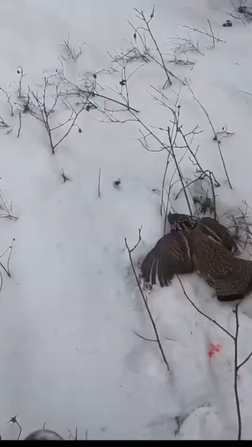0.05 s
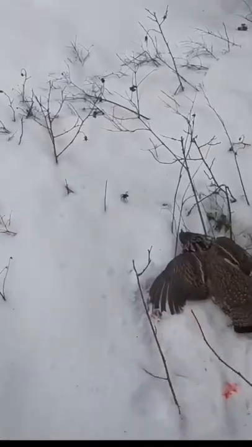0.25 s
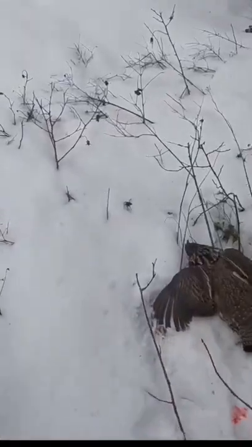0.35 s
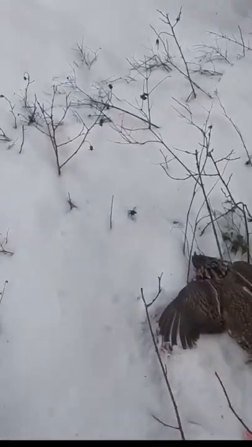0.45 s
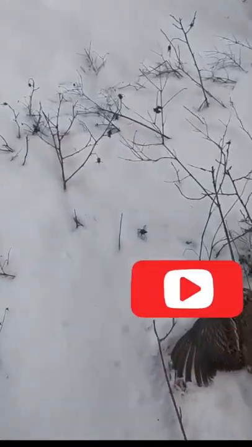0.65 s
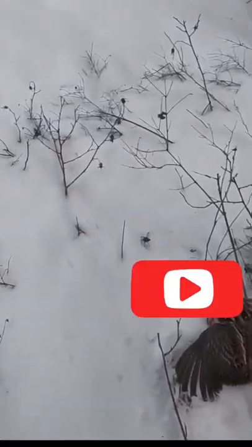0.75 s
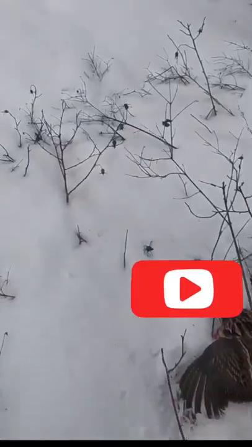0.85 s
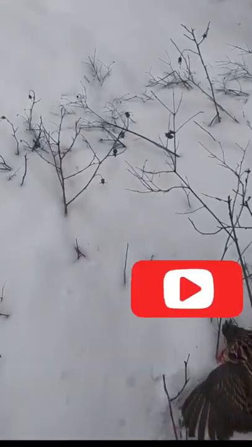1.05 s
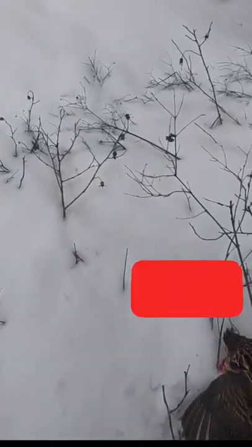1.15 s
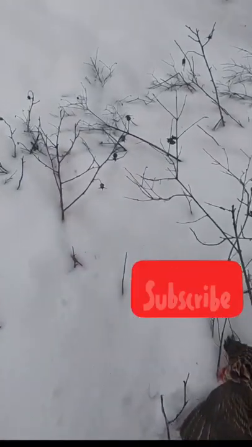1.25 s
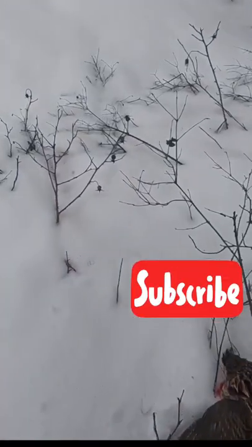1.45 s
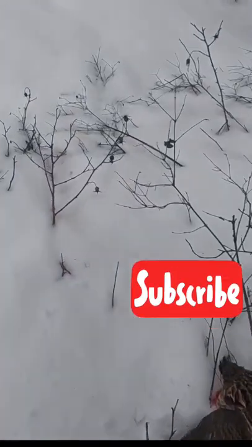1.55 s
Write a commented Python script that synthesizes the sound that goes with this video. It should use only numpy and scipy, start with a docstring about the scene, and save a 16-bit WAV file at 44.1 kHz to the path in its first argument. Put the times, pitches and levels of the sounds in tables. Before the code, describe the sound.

A bird scuffs through soft snow close to the microphone, making a short crunchy swish with dull thumps. It fades to a faint rustle and a few twig ticks, then a soft hollow knock, in quiet outdoor air.

```python
"""A grouse scuffs through soft snow, close by, over a very quiet noise floor.
A faint rustle and a few soft bumps lead in. From 0.2 s its body and feathers push through the snow:
a crunchy swish of tiny fractures and rubbing, with dull thumps and a low rumble underneath.
By 0.8 s the swish has died back to a faint rustle with a few twig ticks.
At 1.4 s comes a hollow knock, and right behind it a weaker rebound."""
import sys
import numpy as np
from scipy import signal
from scipy.fft import rfft, irfft, next_fast_len
from scipy.io import wavfile

SR = 44100
rng = np.random.default_rng(int(sys.argv[2]) if len(sys.argv) > 2 else 0)


def transcribe(signal):
    """Save signal, clipped to [-1, 1], as a 16-bit WAV file at the path in sys.argv[1]."""
    frames = np.atleast_2d(signal).T
    limited = np.clip(frames, -1, 1)
    pcm = np.round(limited * 32767).astype(np.int16)
    wavfile.write(sys.argv[1], SR, pcm)


N = 70560
TIME = np.arange(N) / SR

# Fader rides for the noise layers. Each row: time in seconds, level in dB.
RUMBLE_FADER = [(0, -62), (0.13, -75.5), (0.2, -67), (0.26, -46), (0.35, -54), (0.44, -44.5), (0.52, -52.5),
                (0.56, -52), (0.62, -52), (0.69, -67), (0.92, -67.5), (1.05, -78), (1.36, -88.5),
                (1.42, -86), (1.47, -71.5), (1.59, -67.5)]
HISS_FADER = [(0.03, -103), (0.17, -85), (0.33, -80), (0.375, -63), (0.42, -77), (0.55, -85.5), (0.6, -80),
              (0.71, -83), (0.745, -75.5), (0.79, -89), (0.83, -80.5), (0.88, -92.5), (0.945, -79.5),
              (1.12, -91), (1.25, -85.5), (1.32, -103.5), (1.5, -103), (1.59, -84)]
RUSTLE_FADER = [(0.024, -97), (0.038, -66.5), (0.08, -72), (0.158, -62.5), (0.19, -70), (0.5, -64.5),
                (0.68, -67), (0.745, -68), (0.79, -80), (0.865, -77.5), (0.93, -70), (1.0, -70),
                (1.17, -75.5), (1.24, -74.5), (1.325, -85), (1.395, -70.5), (1.48, -77), (1.55, -72)]
CRUNCH_FADER = [(0.03, -91), (0.2, -65), (0.216, -59), (0.242, -48.5), (0.276, -57), (0.306, -44.5),
                (0.34, -49.5), (0.372, -42.5), (0.394, -50), (0.43, -61), (0.444, -56), (0.465, -75.5),
                (0.49, -58.5), (0.558, -65), (0.578, -50), (0.605, -67.5), (0.74, -86.5), (0.8, -107)]
# EQ curves for the noise layers. Each row: frequency in Hz, relative gain in dB.
FLOOR_EQ = [(30, -3), (90, 9), (300, -8.5), (1200, -7), (1500, -8.5), (2700, -14), (3500, -25.5),
            (5600, -27), (6300, -15), (8500, -38.5)]
RUMBLE_EQ = [(10, -18.5), (30, 9.5), (55, -22.5), (85, 0.5), (150, -19), (300, -19), (600, -58),
             (2000, -100)]
HISS_EQ = [(1500, -28), (3000, -5.5), (4800, -2), (5750, -3), (6200, 11.5), (6800, -2.5), (7600, -4.5),
           (8500, -27)]
RUSTLE_EQ = [(40, -18), (90, 3.5), (200, 0.5), (380, -5), (680, -1), (1220, -1.5), (1360, -16),
             (1700, -12.5), (2700, -17), (3200, -33), (5000, -31.5), (8500, -48.5)]
CRUNCH_EQ = [(50, -21.5), (150, 2.5), (380, 6.5), (560, -2.5), (1220, -2), (1360, -20.5), (1600, -12.5),
             (2700, -17), (3200, -20.5), (4600, -29), (5600, -33.5), (6300, -23), (7400, -37.5),
             (8500, -65.5)]
# Stereo width. Each row: frequency in Hz, side over mid in dB.
WIDTH = [(60, -65), (500, -44.5), (1300, -43), (2800, -25), (4000, -17), (5200, -10), (6200, -5),
         (8000, -0.5)]
# Twig ticks and short scuffs of crust.
# Each row: start in seconds, peak in dB, centre in Hz, half-width in octaves, t60 in seconds.
TICKS = [(0.035, -49, 407, 1.1, 0.087), (0.2245, -38, 330, 1.02, 0.046), (0.4404, -49, 2600, 0.58, 0.0034),
         (0.441, -47, 800, 0.58, 0.021), (0.486, -46.5, 450, 0.74, .035), (0.572, -50, 2015, 0.27, 0.028),
         (0.591, -56, 6100, 1.1, .015), (0.678, -48.5, 840, 1.08, 0.011), (0.886, -54.5, 515, 1.25, 0.016),
         (1.049, -53, 2240, 1.64, 0.032), (1.218, -65, 1180, 1.1, 0.02), (1.374, -59.5, 400, 1.75, 0.012),
         (1.406, -53.5, 1150, 0.44, 0.053), (1.511, -62, 228, 0.46, 0.34)]
# The knock and its rebound. Each row: start in seconds, level in dB.
KNOCKS = [(1.4108, -38), (1.4297, -47)]
# The knock's resonances. Each row: pitch in Hz, gain in dB, t60 in seconds, attack in seconds.
KNOCK_MODES = [(252.3, 4.5, 0.054, 0.0043), (545, 3.5, 0.017, 0.0027), (651, 7.5, 0.014, 0.0013),
               (817, -3, 0.016, 0.00067), (1146, -17, 0.019, 0.00098), (1630, -8.5, 0.0093, 0.00044),
               (1900, -15, 0.016, 0.0013)]
# Dull body thumps. Each row: start in seconds, level in dB, starting pitch in Hz.
THUMPS = [(0.042, -50, 84), (0.071, -50.5, 95), (0.121, -52, 113.5), (0.2252, -28, 106.6),
          (0.306, -27.5, 91.4), (0.323, -30.5, 42.7), (0.369, -27.5, 111.2), (0.3808, -33, 99.4),
          (0.399, -34, 83.2), (0.4477, -34, 124.7), (0.491, -34.5, 88), (0.5055, -42.5, 48.5),
          (0.5702, -36, 102), (0.577, -39, 36.4), (0.726, -59.5, 113), (0.8204, -53, 89),
          (0.8875, -54.5, 140), (0.924, -58.5, 92), (1.2229, -60, 109), (1.427, -45.5, 130.6),
          (1.454, -53, 44.6)]


def amp(db):
    """Decibels to gain."""
    return 10 ** (np.asarray(db) / 20)


def unit(x):
    """Scale to rms 1."""
    return x / np.sqrt(np.mean(x ** 2) + 1e-20)


def curve_gain(points, hz):
    """Gain from (Hz, dB) points on a log frequency axis."""
    freqs, db = np.transpose(points)
    return amp(np.interp(np.log(hz + 1), np.log(freqs + 1), db))


def fader(points):
    """Gain per sample from (s, dB) points."""
    return amp(np.interp(TIME, *np.transpose(points)))


def since(start):
    """Seconds since an event, zero before it."""
    return np.maximum(TIME - start, 0)


def filtered(x, response):
    """Filter x by a gain given as a function of Hz."""
    size = next_fast_len(N + 8192)
    return irfft(rfft(x, size) * response(np.fft.rfftfreq(size, 1 / SR)), size)[..., :N]


def noise():
    """Two unrelated white noises."""
    return rng.standard_normal((2, N))


def stereo(pair, eq, widen_db=0):
    """EQ a pair of noises and scale to rms 1: mono in the bass, wide in the treble."""
    mid = filtered(pair[0], lambda hz: curve_gain(eq, hz))
    side = amp(widen_db) * filtered(pair[1], lambda hz: curve_gain(eq, hz) * curve_gain(WIDTH, hz))
    return unit(np.array([mid + side, mid - side]))


def grains(per_second, spread_db, rubbing):
    """Tiny fractures of uneven size over smooth rubbing noise."""
    sizes = amp(spread_db * np.minimum(rng.exponential(size=(2, N)), 4))
    breaks = rng.random((2, N)) < per_second / SR
    return unit(breaks * sizes * np.sign(noise())) + rubbing * noise()


def ring(t, hz, t60, attack):
    """One damped resonance; t60 and attack are in seconds."""
    return amp(-60 * t / t60) * (1 - np.exp(-t / attack)) * np.sin(2 * np.pi * hz * t)


def noise_floor():
    """A very quiet, steady background noise with a thin high hiss."""
    return amp(-79) * stereo(noise(), FLOOR_EQ)


def rumble():
    """Moving air swells in the low end, under the thumps."""
    return fader(RUMBLE_FADER) * stereo(noise(), RUMBLE_EQ)


def snow_rustle():
    """Lightly brushed snow, more rubbing than fracture: a faint rustle with a hiss on top."""
    texture = dict(per_second=1400, spread_db=6, rubbing=2)
    rustle = fader(RUSTLE_FADER) * stereo(grains(**texture), RUSTLE_EQ)
    hiss = fader(HISS_FADER) * stereo(grains(**texture), HISS_EQ, widen_db=1)
    return rustle + hiss


def twig_ticks():
    """Twigs and crust give way: one snap and a crumbling tail, each round its own pitch."""
    out = np.zeros(N)
    for start, db, centre, octaves, t60 in TICKS:
        crumble = (TIME > start) * amp(-60 * since(start) / t60) * noise()[0]
        force = 1.35 * crumble / np.linalg.norm(crumble)  # the tail outweighs the snap
        force[round(start * SR)] += 1  # the snap
        burst = filtered(force, lambda hz: np.exp(-(np.log2((hz + 1) / centre) / octaves) ** 2))
        out += amp(db) * burst / np.abs(burst).max()
    return out


def hollow_knock():
    """A hollow, well damped knock and its weaker rebound; the soft contact dulls the top end."""
    out = np.zeros(N)
    for start, db in KNOCKS:
        for hz, mode_db, t60, attack in KNOCK_MODES:
            out += amp(db + mode_db) * ring(since(start), hz, t60, attack)
    return signal.sosfilt(signal.butter(2, 1900, fs=SR, output="sos"), out)


def body_thumps(rise_cycles=0.67, sag_per_cycle=0.24):
    """Soft pushes that swing about twice and sag in pitch, each with the same brief hollow note."""
    out = np.zeros(N)
    for start, db, hz in THUMPS:
        t = since(start)
        age = t * hz / rise_cycles
        swell = (age * np.exp(1 - age)) ** 2  # peaks at age 1
        cycles = np.log1p(sag_per_cycle * t * hz) / sag_per_cycle
        push = swell * np.sin(2 * np.pi * cycles)
        hollow_note = amp(-8.5) * ring(t, hz=213.4, t60=0.053, attack=0.004)
        out += amp(db) * (push + hollow_note)
    return out


def snow_crunch():
    """Snow crunches under the sliding bird: dense, even fractures, narrow in the stereo field."""
    fractures = grains(per_second=1700, spread_db=1.5, rubbing=0.69)
    return fader(CRUNCH_FADER) * stereo(fractures, CRUNCH_EQ, widen_db=-5.5)


def scene():
    """The bird's scuffle and the small accents over the noise floor, with no echo."""
    scuffle = snow_crunch() + snow_rustle() + body_thumps() + rumble()
    return scuffle + twig_ticks() + hollow_knock() + noise_floor()


def record(dry):
    """A steep high cut on the whole mix."""
    cutoff_hz = 8300
    return filtered(dry, lambda hz: 1 / np.sqrt(1 + (hz / cutoff_hz) ** 70))


dry = scene()
out = record(dry)
transcribe(out)
```